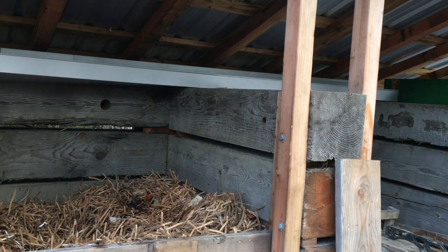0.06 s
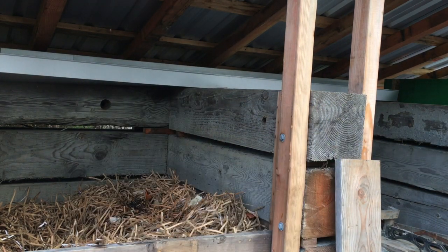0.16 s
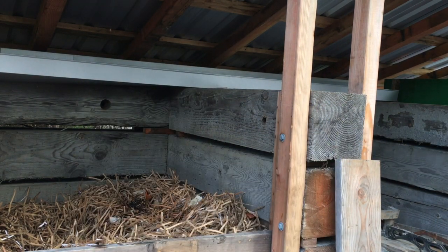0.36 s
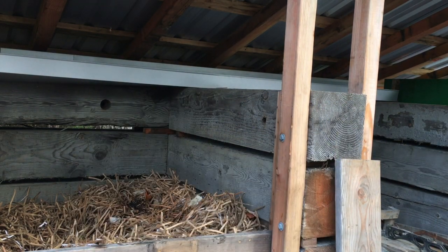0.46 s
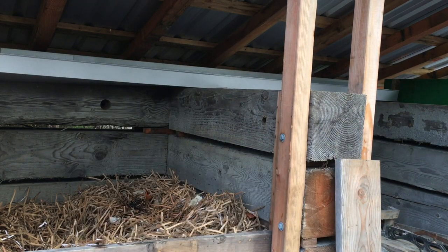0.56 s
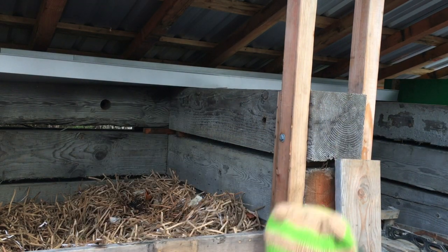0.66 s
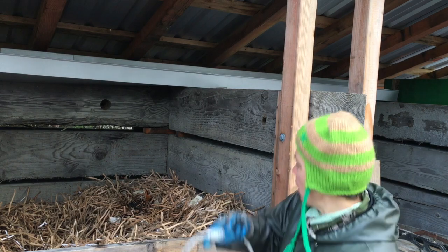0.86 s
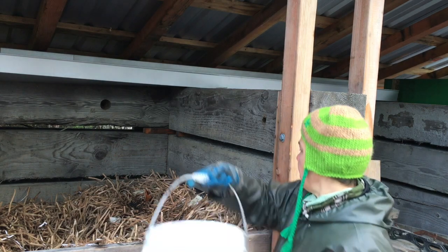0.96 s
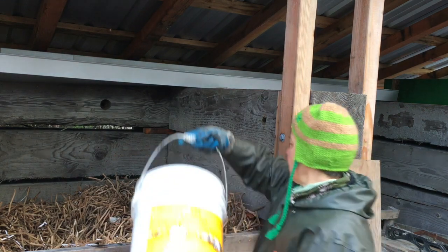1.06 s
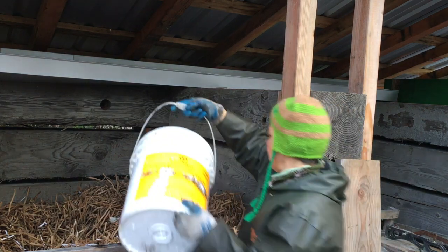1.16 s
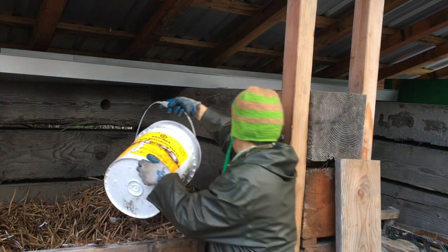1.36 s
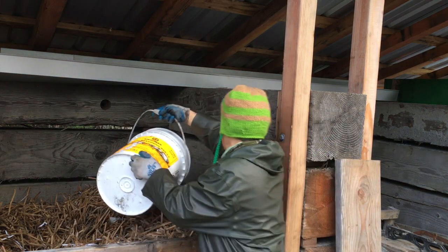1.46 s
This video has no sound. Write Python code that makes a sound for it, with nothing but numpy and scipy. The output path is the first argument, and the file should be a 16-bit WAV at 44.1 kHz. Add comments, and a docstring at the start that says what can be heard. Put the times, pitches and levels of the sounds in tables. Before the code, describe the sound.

A plastic bucket's wire handle clatters and squeaks, then the bucket takes a duller knock.

```python
"""Beside a wooden compost bay, a plastic bucket is picked up. Its wire handle clatters on the hollow wall,
exciting the modes of wire, wall and body, amid short ringing pings. Stick-slip friction makes the sliding
bucket rub and hiss and a rain jacket rustle; the bucket takes one duller knock and gloved pats as it is lifted.
Plank walls and a low roof reflect the sound briefly over a quiet outdoor hum."""
import sys
import numpy as np
from scipy import signal
from scipy.fft import rfft, irfft, next_fast_len
from scipy.io import wavfile
from scipy.ndimage import map_coordinates

SR = 44100
rng = np.random.default_rng(int(sys.argv[2]) if len(sys.argv) > 2 else 0)


def output_pcm(signal):
    """Save a mono or channel-first signal as 16-bit PCM at the path in sys.argv[1].

    Samples are clipped to [-1, 1] before scaling.
    """
    pcm = np.clip(np.atleast_2d(signal).T, -1, 1) * 32767
    wavfile.write(sys.argv[1], SR, np.round(pcm).astype(np.int16))


N = 66150
TIME = np.arange(N) / SR
RING_TIME = np.arange(SR // 2) / SR

# spectrum of the outdoor air: frequency_hz, gain_db
AIR_SPECTRUM = [(20, -39), (42, -24), (60, -3), (78, -2.5), (110, 0.5), (190, -5.5), (300, -7.5), (600, -9),
                (1200, -12), (2400, -11.5), (5000, -17.5), (10000, -21.5), (15800, -22.5)]
# partials of the faint hum: pitch_hz, level_db
HUM_PARTIALS = [(61, -78), (122, -70), (181, -76), (201, -80)]

# blows of the handle on the wall: start_s, clack_db, snap_db, ring_db, drum_db
HANDLE_BLOWS = [(0.0, -43.5, -59, -70, -47.5), (0.2336, -17.5, -20.5, -26, -31.5),
                (0.272, -37, -58, -38, -73), (0.357, -53, -70, -56, -80), (0.3998, -22, -29, -28, -41.5),
                (0.5017, -29, -37, -36.5, -54), (0.5237, -45.5, -50, -34, -73),
                (.5545, -40.5, -57, -50, -47.5), (.5825, -68, -53, -66, -54)]
# spectra of a blow's clack and treble snap: frequency_hz, gain_db
CLACK_SPECTRUM = [(100, -44), (200, -12.5), (300, -24), (550, -10), (900, -23.5), (1150, -2), (1400, -21),
                  (1750, -10), (2200, 2), (2700, -4.5), (3400, 1.5), (4500, -6), (6200, -11.5), (8000, -16),
                  (16000, -29)]
SNAP_SPECTRUM = [(500, -44), (3000, 3.5), (4500, 4.5), (8000, 0), (10500, 2), (13000, -8), (16000, -15)]
# their decay times: frequency_hz, t60_s
CLACK_DECAY = [(200, 0.11), (1000, 0.14), (2300, 0.16), (4000, 0.11), (6300, .15), (9000, 0.06),
               (16000, 0.13)]
SNAP_DECAY = [(1000, 0.026), (16000, 0.028)]
# modes of the plastic wall, wire handle and hollow body: pitch_hz, gain_db, t60_s
WALL_MODES = [(1109, -15, .16), (1565, -19, .13), (2043, -10, .15), (2142, -5, .16), (2180, -7, .15),
              (2246, -3, .19), (2356, -3, .17), (2450, 0, .18), (2729, -13, .18), (2852, -9, .2),
              (3172, -9, .15), (3390, -9, .13), (3925, -11, .14), (4234, -14, .16)]
WIRE_MODES = [(3670, -12, .13), (3768, -10, .14), (5070, -13, .15), (5190, -15, .14), (5887, -18, .15),
              (6214, -16, .16), (6330, -20, .15), (7150, -19, .09), (7350, -20, .09), (9750, -20, .045)]
BODY_MODES = [(198.4, -14.5, 0.16), (435.1, -1, 0.29), (452.3, -7, 0.19), (559, -4, 0.1),
              (777.3, -8.5, 0.22)]

# envelopes of the sliding bucket's rub and fine hiss: time_s, level_db
RUB_ENVELOPE = [(0, -47), (.05, -48), (.075, -73), (.17, -61.5), (.215, -47.5), (.23, -57.5), (.3, -42.5),
                (.33, -40), (.35, -56.5), (.385, -43), (.397, -52), (.44, -32), (.475, -36.5), (.495, -54),
                (.54, -38), (.6, -46.5), (.622, -71), (.7, -64), (.82, -58.5), (.87, -60), (1.0, -67),
                (1.12, -109)]
HISS_ENVELOPE = [(.12, -78), (.22, -66.5), (.29, -64), (.33, -52.5), (.37, -65), (.45, -56.5), (.49, -68),
                 (.55, -60), (.6, -91), (.65, -76), (.688, -56), (.7, -66.5), (.78, -57.5), (.84, -63),
                 (.87, -70), (1.03, -77), (1.12, -77)]
# their spectra: frequency_hz, gain_db
RUB_SPECTRUM = [(150, -22), (900, -18), (1300, -37), (1550, -1), (1750, -13.5), (2250, 4), (2480, -2),
                (2700, -4.5), (3400, -2.5), (4500, -9), (6300, -14.5), (8000, -29), (16000, -47)]
HISS_SPECTRUM = [(1000, -18), (3000, -9), (6000, -2), (9000, -1.5), (13000, 6), (16000, -5.5)]
# short ringing pings: start_s, level_db, pitch_hz, length_s, roughness_rad
RINGING_PINGS = [(0.0226, -34, 2306, 0.0065, 0.26), (.031, -49.5, 1130, 0.017, 0.2),
                 (0.0427, -33.5, 2250, 0.004, 0.11), (0.185, -41, 2303, 0.015, 0.13),
                 (0.239, -20.5, 3810, 0.0067, 1.45), (0.244, -22, 2439, 0.021, .4),
                 (0.271, -26.5, 2414, 0.017, 0.42), (0.323, -49.5, 1550, .018, .2),
                 (0.342, -44, 6330, .014, .8), (0.355, -39.5, 3330, 0.0085, 1.6),
                 (0.359, -47.5, 1510, .014, .2), (0.379, -49, 1526, 0.019, 0.17),
                 (0.398, -32, 3300, 0.0078, 1.5), (0.424, -18.5, 2410, 0.00524, 0.3),
                 (0.432, -17.5, 2390, 0.0043, 0.31), (0.504, -28.5, 3277, 0.0087, 0.84),
                 (0.5225, -26.5, 2280, 0.005, 0.22), (.529, -30, 2220, 0.0062, 0.25),
                 (0.553, -30, 3180, .013, 1.4), (0.58, -36.5, 3260, 0.015, 1.4),
                 (0.773, -63, 1300, 0.071, 0.3), (0.819, -52.5, 2190, 0.02, 0.54),
                 (0.982, -49, 2380, 0.013, 0.35)]

# small ticks: start_s, level_db
TICK_EVENTS = [(0.204, -53), (0.667, -55.5), (1.274, -56.5), (1.3933, -50.5)]
# spectrum of a tick: frequency_hz, gain_db
TICK_SPECTRUM = [(300, 0), (2500, 0), (5000, 2), (11000, -5.5), (16000, -19)]
# its decay times: frequency_hz, t60_s
TICK_DECAY = [(1000, 0.043), (16000, 0.037)]

# envelope of the jacket's rustle: time_s, level_db
JACKET_ENVELOPE = [(.84, -93), (.88, -72), (.905, -53.5), (.925, -57), (.955, -63), (.985, -53),
                   (1.03, -48.5), (1.043, -49), (1.068, -53.5), (1.088, -44.5), (1.105, -59.5),
                   (1.125, -66.5), (1.24, -63), (1.34, -71.5), (1.44, -61.5), (1.5, -80)]
# spectrum of the rubbing fabric: frequency_hz, gain_db
JACKET_SPECTRUM = [(200, -6.5), (1000, -9.5), (2200, 1.5), (3300, 0.5), (4500, -3.5), (6300, -3),
                   (8000, -11.5), (16000, -15)]
# brushes of the sleeve over the jacket: start_s, level_db
SLEEVE_BRUSHES = [(0.8749, -50), (1.072, -50.5)]
# decay times within a brush: frequency_hz, t60_s
SLEEVE_DECAY = [(1000, 0.096), (3000, 0.45), (12000, 0.11)]

# the duller knock and its rebound: start_s, level_db
KNOCK_BLOWS = [(1.0473, -28), (1.0525, -38)]
# spectra of the knock and the crack at each contact: frequency_hz, gain_db
KNOCK_SPECTRUM = [(100, -27), (400, -14), (750, 1), (1000, -7.5), (1450, 0), (1900, -4), (2500, 2),
                  (3400, 1.5), (4200, -10), (5400, 0), (7000, -9), (8500, -29), (16000, -25)]
CRACK_SPECTRUM = [(1000, -5), (3000, -15), (5400, 4), (7500, -17), (13000, -8), (16000, -22)]
# their decay times: frequency_hz, t60_s
KNOCK_DECAY = [(300, .1), (1300, 0.11), (3000, 0.036), (12000, 0.039)]
CRACK_DECAY = [(1000, 0.016), (16000, 0.018)]
# modes of the bucket's base: pitch_hz, gain_db, t60_s
BASE_MODES = [(342, -13.5, 0.24), (555, -11.5, 0.22), (720, 1.5, .18), (796, 1.5, 0.15), (1225, -10, 0.092),
              (1234, 7.5, 0.15), (1532, 2.5, 0.077), (2490, 11, 0.051)]
# gloved fingers patting the bucket: start_s, level_db, pitch_hz
GLOVE_PATS = [(1.1535, -49.5, 710), (1.1546, -42.5, 316), (1.4354, -49.5, 605)]
# reverberation times of the plank bay: frequency_hz, t60_s
BAY_DECAY = [(200, 0.31), (2500, 0.13), (12000, 0.15)]


def amp(db):
    """Amplitude ratio of a level in decibels."""
    return 10 ** (np.asarray(db) / 20)


def unit_rms(x):
    """Normalisation to unit mean power."""
    return x / np.sqrt(np.mean(x ** 2) + 1e-20)


def along(points, hz):
    """Interpolation on a logarithmic frequency axis."""
    frequencies, values = np.transpose(points)
    return np.interp(np.log(hz + 1), np.log(frequencies + 1), values)


def wobble(rate_hz, t):
    """Smooth random modulation: a spline through rate_hz knots a second."""
    return map_coordinates(rng.standard_normal(4096), [t * rate_hz], mode="wrap")


def noise(spectrum, size):
    """Spectral shaping of white noise, at unit rms."""
    gain = amp(along(spectrum, np.fft.rfftfreq(size, 1 / SR)))
    return unit_rms(irfft(rfft(rng.standard_normal(size)) * gain, size))


def add(track, start_s, sound):
    """Superposition of a sound on the track from start_s."""
    start = max(round(start_s * SR), 0)
    track[start:start + len(sound)] += sound[:max(N - start, 0)]


def burst(spectrum, decay, attack_s=0.0001):
    """Modal overlap: dense resonances merge into noise, each band decaying at its own rate."""
    hz, t, bands = signal.stft(noise(spectrum, len(RING_TIME)), SR, nperseg=128)
    damping = amp(-60 * t / along(decay, hz)[:, None])
    tail = signal.istft(bands * damping, SR, nperseg=128)[1][:len(RING_TIME)]
    return tail * (1 - np.exp(-RING_TIME / attack_s))


def ring(modes, attack_s, scatter_db, drift_rad):
    """Free vibration: damped modes, varying in level and phase from blow to blow."""
    t = RING_TIME
    tones = np.zeros(len(t))
    for hz, db, t60_s in modes:
        envelope = amp(db + scatter_db * rng.normal() - 60 * t / t60_s)
        tones += envelope * np.sin(2 * np.pi * hz * t + drift_rad * wobble(74, t))
    return tones * (1 - np.exp(-t / attack_s))


def friction(envelope, carrier, grain_db, grain_hz):
    """Stick-slip motion modulates a carrier's amplitude at random under a level envelope."""
    grains = unit_rms(carrier * amp(grain_db * wobble(grain_hz, TIME)))
    return grains * amp(np.interp(TIME, *np.transpose(envelope)))


def outdoors(air_db=-64, waver_db=3):
    """Ambient noise: broadband air and a hum slowly modulated in amplitude and phase."""
    hum = np.zeros(N)
    for hz, db in HUM_PARTIALS:
        peak = np.sqrt(2) * amp(db + waver_db * wobble(7.7, TIME))
        hum += peak * np.sin(2 * np.pi * hz * TIME + 0.32 * wobble(8.8, TIME))
    return amp(air_db) * noise(AIR_SPECTRUM, N) + hum


def handle_clatter(shared_power=0.33, echo_s=0.0022, echo_db=-6):
    """Impact excitation: each blow snaps, clacks and sets wall, wire and hollow body ringing."""
    out = np.zeros(N)
    shared = burst(CLACK_SPECTRUM, CLACK_DECAY, attack_s=0.00073)  # alike at every blow
    for start_s, clack_db, snap_db, ring_db, drum_db in HANDLE_BLOWS:
        fresh = burst(CLACK_SPECTRUM, CLACK_DECAY, attack_s=0.00044)
        clack = np.sqrt(shared_power) * shared + np.sqrt(1 - shared_power) * fresh
        snap = burst(SNAP_SPECTRUM, SNAP_DECAY)
        add(out, start_s, amp(clack_db) * clack + amp(snap_db) * snap)
        snap_echo = burst(SNAP_SPECTRUM, SNAP_DECAY)  # reflection from the near planks
        add(out, start_s + echo_s, amp(snap_db + echo_db) * snap_echo)
        wall = ring(WALL_MODES, attack_s=0.0045, scatter_db=-2.1, drift_rad=0.31)
        wire = ring(WIRE_MODES, attack_s=0.00067, scatter_db=6.5, drift_rad=0.45)
        body = ring(BODY_MODES, attack_s=0.0037, scatter_db=1.0, drift_rad=0.25)
        add(out, start_s, amp(ring_db) * (wall + wire) + amp(drum_db) * body)
    return out


def bucket_slide(resonance_db=-4):
    """Forced vibration: sliding friction rubs, hisses and drives the modes of wall and wire."""
    response = ring(WALL_MODES + WIRE_MODES, attack_s=0.00061, scatter_db=0.0, drift_rad=0.24)
    force = rng.standard_normal(N + len(response) - 1)
    resonance = unit_rms(signal.fftconvolve(force, response, mode="valid"))
    carrier = noise(RUB_SPECTRUM, N) + amp(resonance_db) * resonance
    rub = friction(RUB_ENVELOPE, carrier, grain_db=3.5, grain_hz=300)
    hiss = friction(HISS_ENVELOPE, noise(HISS_SPECTRUM, N), grain_db=2.0, grain_hz=700)
    return rub + hiss


def pings(overtone_db=-17):
    """Short tonal pings: each sounds briefly; phase modulation roughens some to a scrape."""
    out = np.zeros(N)
    for start_s, db, hz, length_s, roughness_rad in RINGING_PINGS:
        t = RING_TIME[RING_TIME < length_s]
        phase = 2 * np.pi * hz * t + roughness_rad * wobble(1125, t)
        chirp = np.sin(phase) + amp(overtone_db) * np.sin(2 * phase)
        add(out, start_s, amp(db) * np.sin(np.pi * t / length_s) * chirp)
    return out


def ticks():
    """Heavily damped broadband transients, heard as small ticks."""
    out = np.zeros(N)
    for start_s, db in TICK_EVENTS:
        add(out, start_s, amp(db) * burst(TICK_SPECTRUM, TICK_DECAY))
    return out


def jacket_rustle():
    """Friction in the jacket's fabric radiates grainy broadband noise."""
    return friction(JACKET_ENVELOPE, noise(JACKET_SPECTRUM, N), grain_db=2.5, grain_hz=300)


def sleeve_brushes(length_s=0.058):
    """Transient friction: the sleeve catches abruptly on the jacket and runs out."""
    out = np.zeros(N)
    fade = np.clip(1 - (RING_TIME / length_s) ** 2, 0, 1)
    for start_s, db in SLEEVE_BRUSHES:
        add(out, start_s, amp(db) * burst(JACKET_SPECTRUM, SLEEVE_DECAY, attack_s=0.00072) * fade)
    return out


def base_knock(base_db=-16, crack_db=-7.5):
    """Impact and rebound: each contact cracks, knocks and excites the modes of the base."""
    out = np.zeros(N)
    for start_s, db in KNOCK_BLOWS:
        knock = burst(KNOCK_SPECTRUM, KNOCK_DECAY, attack_s=0.00039)
        base = ring(BASE_MODES, attack_s=0.0039, scatter_db=2.0, drift_rad=0.56)
        crack = burst(CRACK_SPECTRUM, CRACK_DECAY, attack_s=0.00035)
        add(out, start_s, amp(db) * (knock + amp(base_db) * base + amp(crack_db) * crack))
    return out


def glove_pats(length_s=0.0044):
    """Soft contact: a gloved finger on the bucket gives a low pulse only a few cycles long."""
    out = np.zeros(N)
    t = RING_TIME[RING_TIME < length_s]
    envelope = np.sqrt(np.abs(np.sin(np.pi * t / length_s)))
    for start_s, db, hz in GLOVE_PATS:
        add(out, start_s, amp(db) * envelope * np.sin(2 * np.pi * hz * t))
    return out


def bay_reverberation(direct, level_db=-18.5):
    """Diffuse reflection from planks and roof: convolution with a short impulse response."""
    response = burst([(200, 2), (4000, -7), (14000, 2)], BAY_DECAY, attack_s=0.015)
    return amp(level_db) * signal.fftconvolve(direct, response / np.linalg.norm(response))[:N]


def scene():
    """Superposition of direct sound, reverberation and background in one channel."""
    direct = handle_clatter() + bucket_slide() + pings() + ticks()
    direct += jacket_rustle() + sleeve_brushes() + base_knock() + glove_pats()
    return (direct + bay_reverberation(direct) + outdoors())[None]


def record(dry, low_cut_hz=66, top_hz=15850):
    """Band limiting: the microphone attenuates deep bass and passes nothing above top_hz."""
    size = next_fast_len(N + SR // 2)
    thinned = signal.sosfilt(signal.butter(3, low_cut_hz, "highpass", fs=SR, output="sos"), dry)
    passband = np.fft.rfftfreq(size, 1 / SR) < top_hz
    return irfft(rfft(thinned, size) * passband, size)[:, :N]


dry = scene()
out = record(dry)
output_pcm(out)
```